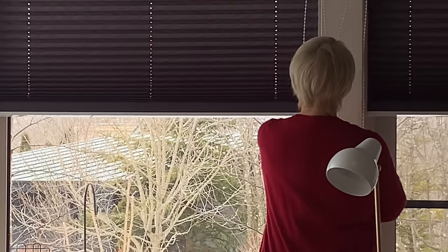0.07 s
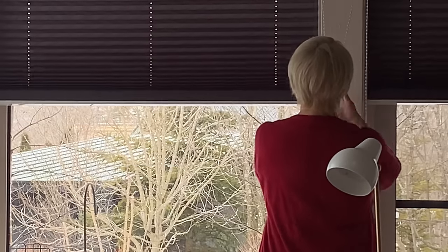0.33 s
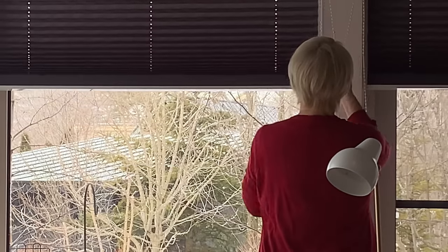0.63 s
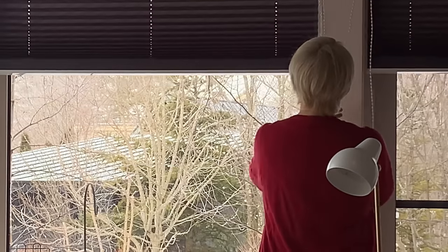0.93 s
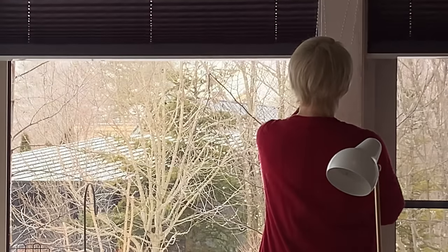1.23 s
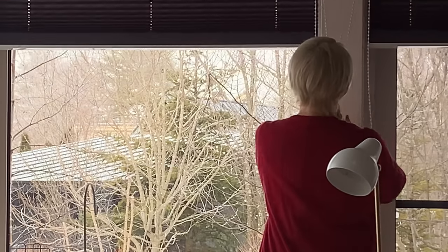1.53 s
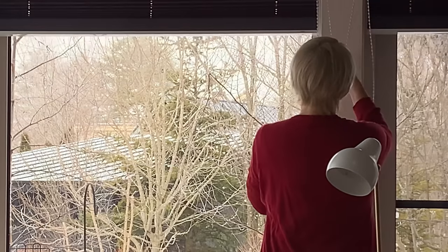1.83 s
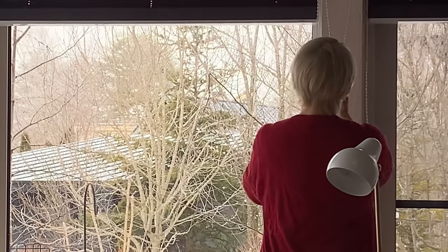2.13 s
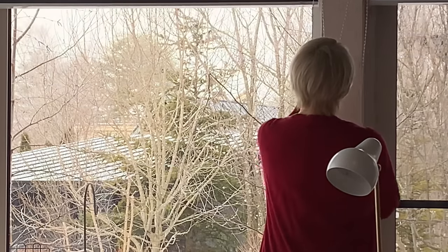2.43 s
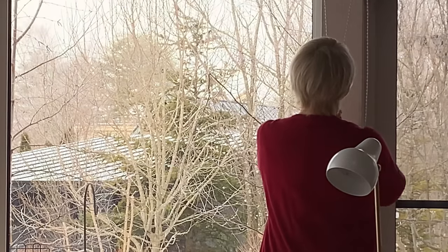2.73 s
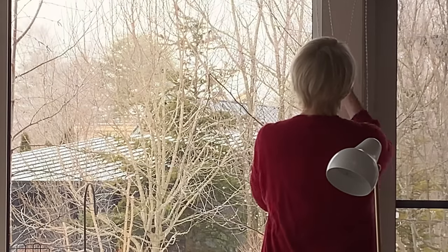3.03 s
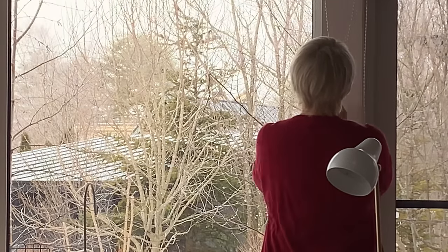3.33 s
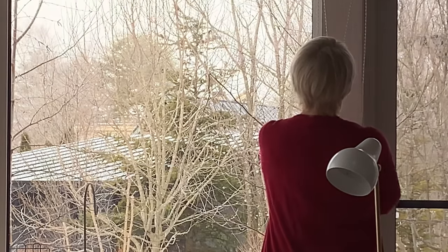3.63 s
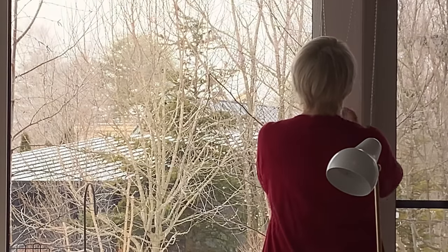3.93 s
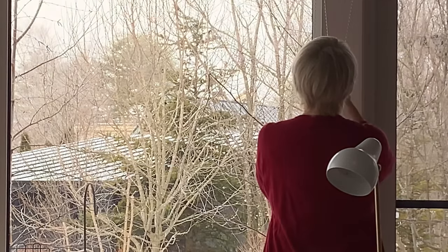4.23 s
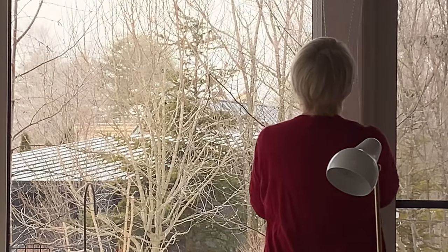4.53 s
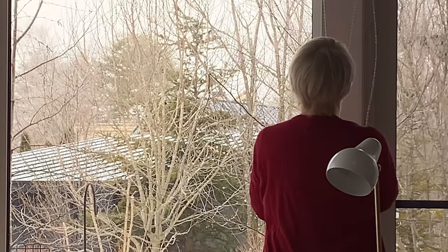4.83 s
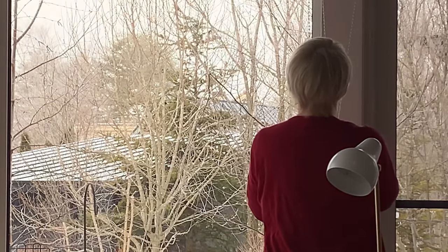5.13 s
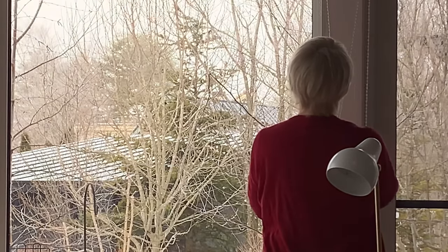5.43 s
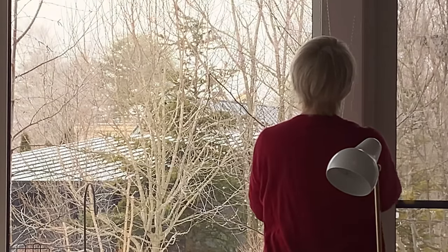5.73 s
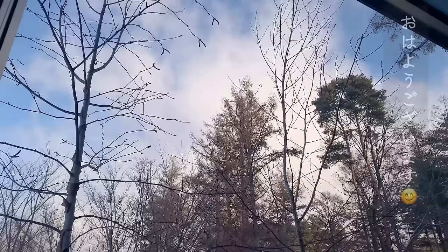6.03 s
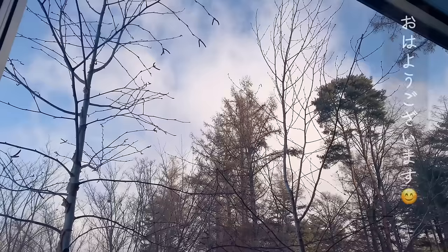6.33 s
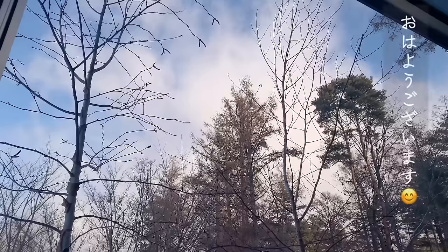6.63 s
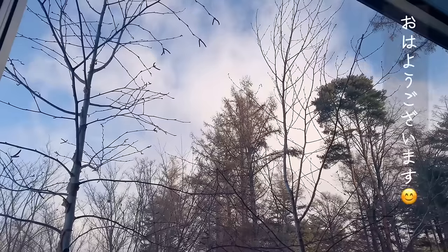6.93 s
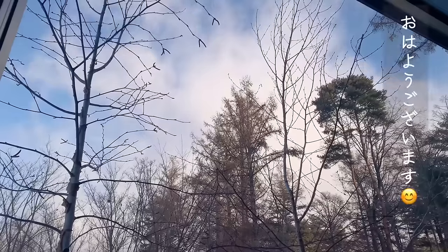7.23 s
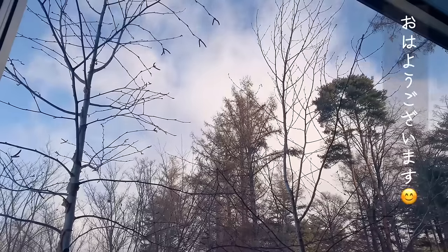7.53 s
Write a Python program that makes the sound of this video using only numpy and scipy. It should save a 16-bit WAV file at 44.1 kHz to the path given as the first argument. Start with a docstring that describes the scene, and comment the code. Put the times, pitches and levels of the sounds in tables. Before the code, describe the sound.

In a living room with a faint electrical hum, a pleated window blind is raised hand over hand by its bead chain. Each pull brings a swell of whirring and fine, bright ticking. The blind bumps softly at the top and the slack chain knocks against the window frame a few times. The sound then cuts to a quiet outdoors, with a distant rush, light wind on the microphone and faint small birds.

```python
"""A bead chain raises a pleated window blind, hand over hand, in a living room with faint mains hum.
Beads tick over the sprocket and sizzle through the guide; the head rail whirrs. The pleats bump at
the top and the slack chain knocks on the frame. At 5.9 s the scene changes to a quiet morning
outdoors: distant rush, light wind on the microphone, small birds whistling."""
import sys
import numpy as np
from scipy import signal
from scipy.fft import rfft, irfft
from scipy.io import wavfile
from scipy.ndimage import uniform_filter1d

SR = 44100
rng = np.random.default_rng(int(sys.argv[2]) if len(sys.argv) > 2 else 0)


def waveform_to_disk(signal):
    """Save audio, clipped to [-1, 1], as 16-bit WAV at the path in sys.argv[1]."""
    frames = np.transpose(np.atleast_2d(signal))
    scaled = np.clip(frames, -1, 1) * 32767
    samples = np.round(scaled).astype(np.int16)
    wavfile.write(sys.argv[1], SR, samples)


N = 342657
TIME = np.arange(N) / SR

# Room decay: (frequency [Hz], T60 [s])
ROOM_DECAY = [(200, 0.42), (1200, 0.58), (3500, 0.34), (9000, 0.36), (16000, 0.3)]
# Mains hum: (frequency [Hz], rms level [dB])
HUM_PARTIALS = [(59.6, -55), (119.2, -63)]
# Background spectra: (frequency [Hz], relative level [dB])
ROOM_AIR_SPECTRUM = [(15, -7), (35, 0), (55, 11), (75, 5), (92, 10.5), (135, -2), (180, -1), (230, -7.5),
                     (280, -3.5), (350, -10), (650, -12.5), (1200, -16), (3000, -18), (8000, -26),
                     (16000, -29)]
RUSH_SPECTRUM = [(40, -26), (100, -5), (190, -6.5), (226, 1), (255, -7), (330, -5), (700, -7),
                 (1500, -13.5), (2300, -19.5), (3200, -23), (4300, -25), (6000, -27.5), (11500, -27),
                 (15500, -25.5)]
WIND_SPECTRUM = [(12, -11), (25, -6), (42, 3.5), (65, -4), (100, -12.5), (170, -31), (400, -55)]
# Gusts: (peak time [s], rise [s], fall [s], level [dB])
WIND_GUSTS = [(6.07, .04, .04, -46), (6.215, .015, 0.047, -43), (6.6, .05, 0.1, -49),
              (6.855, .015, .02, -48), (7.225, .015, .025, -41.5), (7.3, .015, 0.036, -46),
              (7.45, .1, .25, -53)]
# Bird notes: (time [s], length [s], start pitch [Hz], end pitch [Hz], level [dB])
BIRD_NOTES = [(5.9, .16, 4350, 3500, -71), (5.96, .09, 5150, 4850, -77), (6.073, .042, 3900, 4400, -61),
              (6.125, .034, 3830, 4350, -66.5), (6.448, .06, 5280, 4860, -68),
              (6.48, 0.072, 3400, 4220, -66), (6.548, .035, 3650, 4180, -67),
              (6.652, .028, 6230, 5350, -68), (6.705, .12, 4250, 4100, -72), (6.72, .028, 6280, 6560, -69),
              (7.24, 0.11, 4080, 4160, -70)]
# Spectra of the blind's parts and the frame: (frequency [Hz], relative level [dB])
PLEAT_SPECTRUM = [(190, -19), (280, -4), (360, -5), (520, -2), (800, 0), (1300, 1), (2200, -17),
                  (6000, -38)]
FRAME_SPECTRUM = [(150, -10), (450, -5.5), (750, -8), (1080, 3.5), (1450, -2), (1850, -2), (2250, -3.5),
                  (3250, -2.5), (4200, -11.5), (7000, -13), (12000, -26), (16000, -20)]
RATTLE_SPECTRUM = [(1500, -20), (4000, 3.5), (7500, -3), (9500, -0.5), (12000, 0), (16000, -1)]
RAIL_SPECTRUM = [(150, -17), (270, -13.5), (380, -4), (560, -5.5), (720, -6), (1150, 1), (1500, -2),
                 (1820, 0), (2200, -3.5), (2650, -1), (3500, -3), (4500, -7), (6500, -18), (12000, -43)]
SPROCKET_SPECTRUM = [(1500, -22.5), (3300, -8.5), (4200, -5.5), (4700, -0.5), (5200, -0.5), (5900, -4),
                     (6800, -4), (7800, -1), (9200, -8.5), (12000, -16.5), (16000, -23)]
BEAD_SPECTRUM = [(3000, -28), (7000, -29), (9500, -4), (11500, 1.5), (13300, -1.5), (14500, 5.5),
                 (15300, 1), (16000, -3.5)]
# Head rail and housing resonances: (frequency [Hz], width [Hz], lift [dB])
RAIL_MODES = [(423, 33, 3), (501, 26, 4.5), (1254, 42, 2), (1810, 170, 1.5), (2110, 24, 5), (2330, 23, 3.5),
              (2670, 69, 2.5), (3970, 34, 5.5), (4650, 110, 3), (5090, 66, 2.5), (7060, 40, 4),
              (8130, 60, 4), (14212, 40, 4), (15580, 50, 9)]
# Slack chain on the frame: (time [s], relative frame level [dB], relative bead level [dB], decay [s])
CHAIN_KNOCKS = [(4.766, -66, -54, .012), (4.834, -45.5, -51, 0.019), (4.847, -42.5, -43.5, .03),
                (4.89, -43.5, -45.5, .045), (5.07, -61, -80, 0.061), (5.256, -55, -60, 0.017),
                (5.4, -48, -53, 0.013), (5.421, -47, -54, 0.03), (5.672, -75, -58, .018),
                (5.712, -45.5, -56, 0.013), (5.72, -43, -44.5, 0.017), (5.759, -48.5, -68, 0.034)]
# Sharpest bead snaps: (time [s], relative level [dB])
BEAD_SNAPS = [(0.5447, -23), (1.1458, -25), (1.3598, -30), (1.7718, -25), (2.0589, -26), (2.105, -21.5),
              (2.1437, -27), (2.765, -22), (2.829, -24), (2.8698, -27), (3.0179, -28.5), (3.118, -26),
              (3.1473, -25), (4.2988, -34), (4.345, -28.5)]
# Pulls and tugs: (peak time [s], rise [s], fall [s], peak speed [beads/s], extra sizzle [dB])
CHAIN_PULLS = [(.007, .02, 0.033, 17.2, 1), (.415, 0.34, 0.31, 48.6, -0.5), (.66, 0.12, 0.07, 8.1, 5.4),
               (.961, .18, 0.28, 47.7, 0), (1.224, .107, .038, 17, -6), (1.606, 0.22, 0.22, 46, -1.3),
               (1.832, .092, .062, 12.1, 7), (2.218, 0.24, 0.27, 53.5, 0.5), (2.838, 0.24, 0.2, 35, 1),
               (3.334, 0.36, 0.17, 26, -0.5), (3.525, .15, .08, 15, 10), (3.69, .085, 0.14, 25.7, 0),
               (3.969, 0.13, 0.1, 15, 3), (4.463, .124, 0.15, 48, 1), (4.799, 0.062, .087, 5.5, 9)]


def from_db(db):
    """Decibels to gain."""
    return 10 ** (np.asarray(db) / 20)


def unit_rms(x):
    """Scale to rms 1."""
    return x / np.sqrt(np.mean(x ** 2) + 1e-20)


def at_hz(points, hz):
    """Interpolate a table over log frequency."""
    knots_hz, values = np.transpose(points)
    return np.interp(np.log(np.maximum(hz, 1)), np.log(knots_hz), values)


def drift(corner_hz):
    """Smooth random wander, rms 1."""
    hop = 40
    pole = np.exp(-2 * np.pi * corner_hz * hop / SR)
    slow = signal.lfilter([1], [1, -2 * pole, pole * pole], rng.standard_normal(N // hop + 2002))[2000:]
    return np.interp(np.arange(N) / hop, np.arange(len(slow)), unit_rms(slow))


def swell(peak_s, rise_s, fall_s):
    """Asymmetric Gaussian hump, height 1."""
    return np.exp(-((TIME - peak_s) / np.where(TIME < peak_s, rise_s, fall_s)) ** 2)


def colour(x, spectrum, peaks=()):
    """Minimum-phase filter, unit power gain: smooth spectrum plus narrow peaks."""
    size = 8192
    hz = np.arange(size // 2 + 1) * SR / size
    peaks_db = sum(db / (1 + (2 * (hz - centre) / width) ** 2) for centre, width, db in peaks)
    cepstrum = irfft(np.log(from_db(at_hz(spectrum, hz) + peaks_db)))
    cepstrum[1:size // 2] *= 2
    cepstrum[size // 2 + 1:] = 0
    response = irfft(np.exp(rfft(cepstrum)))
    return signal.fftconvolve(x, response / np.linalg.norm(response))[:N]


def fade(kicks, decay_s):
    """Exponential tail on each kick."""
    return signal.lfilter([1], [1, -np.exp(-1 / (decay_s * SR))], kicks + 1e-18)


def die_away(age_s, t60_s):
    """Gain falling 60 dB in t60_s."""
    return from_db(-60 * age_s / t60_s)


def even(x):
    """Hold rms at 1 over a 0.1 s window."""
    return x / np.sqrt(np.abs(uniform_filter1d(x ** 2, SR // 10)) + 1e-12)


def uneven_gains(spread_db):
    """Log-normal gains, clipped at two sigma."""
    return from_db(spread_db * np.clip(rng.standard_normal(N), -2, 2))


def grains(per_s, spread_db):
    """Tiny random contacts, rms 1."""
    sizes = uneven_gains(spread_db) * rng.choice([-1, 1], N)
    return unit_rms(sizes * (rng.random(N) < per_s / SR))


def kick_train(per_s, jitter, spread_db):
    """One kick per passing tooth or bead, uneven in time and strength."""
    passed = np.floor(np.cumsum(per_s * np.exp(jitter * drift(25))) / SR)
    return (np.diff(passed, prepend=0) > 0) * uneven_gains(spread_db)


def room(x, wet_db, spots=3):
    """Contacts fall at several spots, each with its own diffuse tail; power is kept."""
    age_s, tails = TIME[:SR // 2], 0
    edges_hz = np.geomspace(100, 18000, 9)
    for low, high in zip(edges_hz, edges_hz[1:]):
        bandpass = signal.butter(2, [low, high], "band", fs=SR, output="sos")
        band = signal.sosfilt(bandpass, rng.standard_normal((spots, len(age_s))))
        tails = tails + band * die_away(age_s, at_hz(ROOM_DECAY, np.sqrt(low * high)))
    tails *= age_s > .003  # pre-delay
    spot, wet = rng.integers(0, spots, N), from_db(wet_db)
    echo = sum(signal.oaconvolve(x * (spot == k), tail / np.linalg.norm(tail))[:N]
               for k, tail in enumerate(tails))
    return (x + wet * echo) / np.sqrt(1 + wet ** 2)


def room_tone(air_db=-55.5):
    """Still air and an appliance's wavering hum."""
    waver = from_db(.6 * drift(8))
    hum = sum(from_db(db) * np.sqrt(2) * np.sin(2 * np.pi * hz * TIME + .45 * drift(2.9))
              for hz, db in HUM_PARTIALS)
    return waver * hum + from_db(air_db) * colour(rng.standard_normal(N), ROOM_AIR_SPECTRUM)


def distant_rush(level_db=-55.5):
    """Far, nearly steady outdoor noise."""
    return from_db(level_db + .27 * drift(10)) * colour(rng.standard_normal(N), RUSH_SPECTRUM)


def wind(breeze_db=-52.5):
    """Breeze and gusts rumble on the microphone; their powers add."""
    breeze = from_db(breeze_db + 2.1 * drift(8.5))
    gust_power = sum((from_db(db) * swell(*timing)) ** 2 for *timing, db in WIND_GUSTS)
    return np.sqrt(breeze ** 2 + gust_power) * even(colour(rng.standard_normal(N), WIND_SPECTRUM))


def birds(flutter_db=2.2, trees_db=-3.5):
    """Quavering whistles glide, then level off; trees scatter an echo."""
    song = np.zeros(N)
    quaver = 1 + .011 * drift(200)
    for time_s, length_s, start_hz, end_hz, db in BIRD_NOTES:
        progress = np.linspace(0, 1, int(length_s * SR))
        start = round(time_s * SR)
        span = slice(start, start + len(progress))
        hz = (end_hz + (start_hz - end_hz) * (1 - progress) ** 1.6) * quaver[span]
        envelope = from_db(db) * np.sqrt(np.abs(np.sin(np.pi * progress)))
        song[span] += envelope * np.sin(2 * np.pi * np.cumsum(hz) / SR)
    song *= from_db(flutter_db * drift(50))
    scatter = rng.standard_normal(SR // 2) * np.exp(-TIME[:SR // 2] / .11)
    return song + from_db(trees_db) * signal.fftconvolve(song, scatter / np.linalg.norm(scatter))[:N]


def bead_clink(time_s=5.153, level_db=-59, centre_hz=8200, width_hz=1400):
    """Bead on bead: a thin, narrow ring."""
    edges_hz = [centre_hz - width_hz / 2, centre_hz + width_hz / 2]
    bandpass = signal.butter(2, edges_hz, "band", fs=SR, output="sos")
    ring = unit_rms(signal.sosfilt(bandpass, rng.standard_normal(N)))
    age_s = np.maximum(TIME - time_s, 0)
    return from_db(level_db) * (age_s > 0) * die_away(age_s, t60_s=.3) * ring


def pleat_bump(time_s=4.9, gain_db=-44.5, attack_s=.0076):
    """The gathered pleats land softly against the head rail."""
    age_s = np.maximum(TIME - time_s, 0)
    envelope = from_db(gain_db) * die_away(age_s, t60_s=.52) * (1 - np.exp(-age_s / attack_s))
    return colour(envelope * rng.standard_normal(N), PLEAT_SPECTRUM)


def slack_chain(attack_s=.0051):
    """Runs of beads land: the frame booms, the beads rattle. Between knocks, single beads brush it."""
    brushing = swell(peak_s=5.36, rise_s=.19, fall_s=.13)
    touches = unit_rms(fade(kick_train(per_s=70, jitter=.4, spread_db=3), decay_s=.003))
    frame = from_db(-57.5) * brushing
    rattle = from_db(-59) * brushing ** 3 * touches
    for time_s, frame_db, bead_db, decay_s in CHAIN_KNOCKS:
        age_s = np.maximum(TIME - time_s, 0)
        landing = (1 - np.exp(-age_s / attack_s)) * np.exp(-age_s / decay_s)
        frame += from_db(frame_db + 1.5) * landing
        rattle += from_db(bead_db + 5.5) * landing
    return (colour(room(frame * grains(6000, 2.8), wet_db=.5), FRAME_SPECTRUM)
            + colour(room(rattle * grains(4000, 3.7), wet_db=-1), RATTLE_SPECTRUM))


def bead_snaps(beads_per_s, light_share=.07):
    """Beads click into their seats: light snaps by chance, sharp ones at set times."""
    kicks = from_db(-32.5) * (rng.random(N) < light_share * beads_per_s / SR)
    for time_s, db in BEAD_SNAPS:
        kicks[round(time_s * SR)] = from_db(db)
    clicks = room(fade(kicks, decay_s=.0059) * rng.standard_normal(N), wet_db=-1)
    return from_db(-8.5) * colour(clicks, BEAD_SPECTRUM) + from_db(-15) * colour(clicks, SPROCKET_SPECTRUM)


def chain_motion():
    """Pulls sum to the chain speed; each sets the extra sizzle by its share of that speed."""
    strokes = np.array([peak_speed * swell(*timing) for *timing, peak_speed, _ in CHAIN_PULLS])
    beads_per_s = strokes.sum(axis=0) + 1e-9
    extra_sizzle_db = np.array(CHAIN_PULLS)[:, -1] @ strokes / beads_per_s
    return beads_per_s, extra_sizzle_db


def chain_drive(beads_per_s, extra_sizzle_db, brisk_per_s=50):
    """Beads hit the sprocket and sizzle in the guide, the gear buzzes; all shake the head rail."""
    doublings = np.log2(beads_per_s / brisk_per_s)  # faster is louder and brighter
    judder_db = .39 * drift(13)  # the chain runs unevenly
    rail_db = -41 + 6 * doublings + judder_db
    sprocket_db = -41.5 + 7 * doublings + judder_db
    sizzle_db = -39.8 + 8.5 * doublings + judder_db + extra_sizzle_db + 1.3 * drift(13)
    ticks_per_s = np.maximum(beads_per_s, 22)  # even a creeping chain jingles
    beads = even(fade(kick_train(ticks_per_s, jitter=.08, spread_db=2.5), decay_s=.0057))
    gear = even(fade(kick_train(7 * ticks_per_s, jitter=.05, spread_db=2.5), decay_s=.00099))
    ticks = from_db(-1) * beads * grains(18000, 1.8) + from_db(-3.5) * gear * grains(18000, 5.3)
    rail = from_db(rail_db) * even(from_db(-3.5) * ticks + grains(4000, 3.45))
    sprocket = from_db(sprocket_db) * even(ticks + from_db(-1) * grains(5000, 5.5))
    sizzle = from_db(sizzle_db) * even(ticks + from_db(-.5) * grains(3000, 6))
    return (colour(room(rail, wet_db=-1), RAIL_SPECTRUM, RAIL_MODES)
            + colour(room(sprocket, wet_db=-3), SPROCKET_SPECTRUM, RAIL_MODES)
            + colour(room(sizzle, wet_db=-4.5), BEAD_SPECTRUM, RAIL_MODES))


def scene(change_s=5.9, crossfade_s=.01):
    """Indoors, then outdoors; two identical channels."""
    beads_per_s, extra_sizzle_db = chain_motion()
    chain = chain_drive(beads_per_s, extra_sizzle_db) + bead_snaps(beads_per_s) + slack_chain()
    indoors = chain + pleat_bump() + bead_clink() + room_tone()
    outdoors = wind() + distant_rush() + birds()
    outside = np.clip((TIME - change_s) / crossfade_s + .5, 0, 1)
    return np.tile((1 - outside) * indoors + outside * outdoors, (2, 1))


def record(dry):
    """Steep elliptic low-pass."""
    cutoff_hz = 15850
    return signal.sosfilt(signal.ellip(12, .2, 80, cutoff_hz, fs=SR, output="sos"), dry)


dry = scene()
out = record(dry)
waveform_to_disk(out)
```